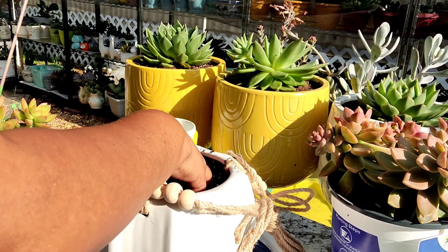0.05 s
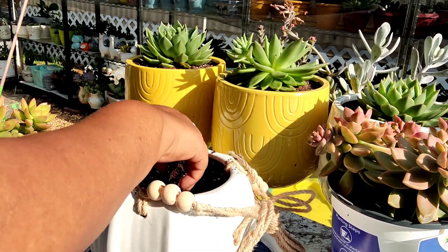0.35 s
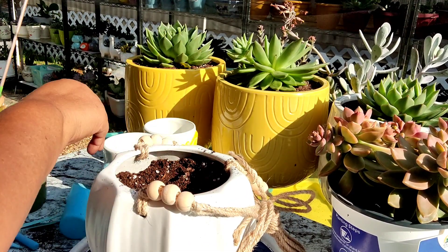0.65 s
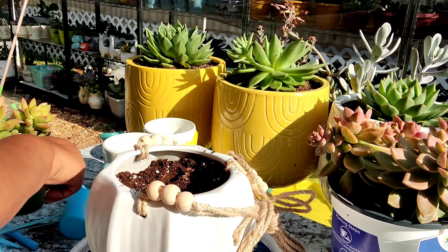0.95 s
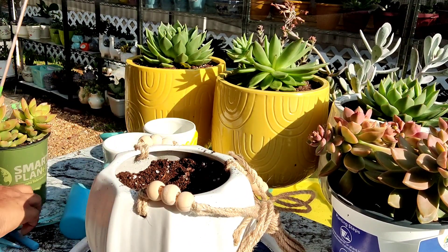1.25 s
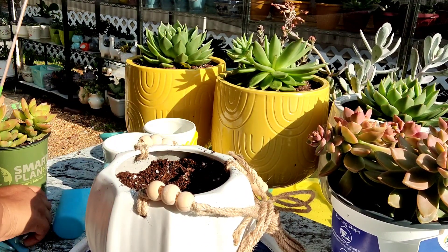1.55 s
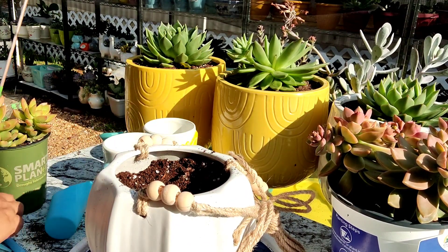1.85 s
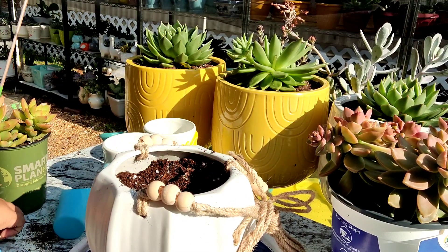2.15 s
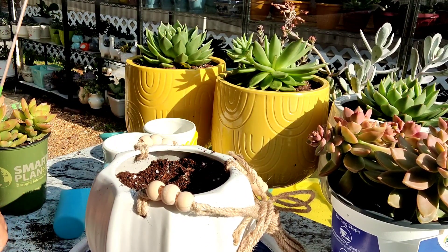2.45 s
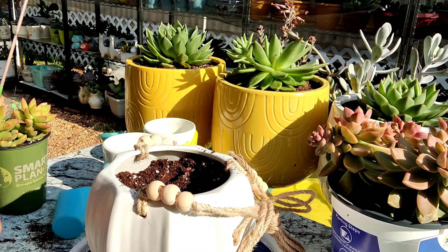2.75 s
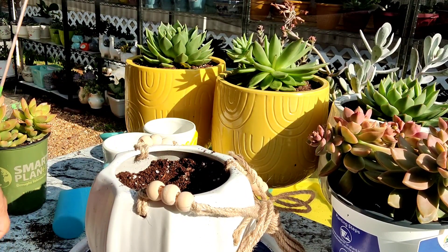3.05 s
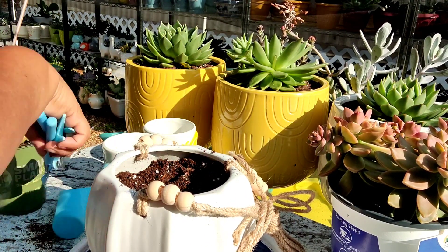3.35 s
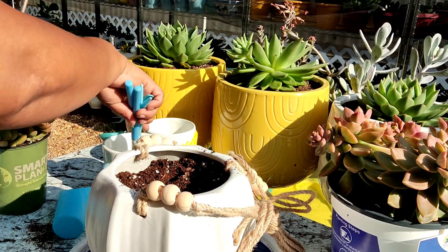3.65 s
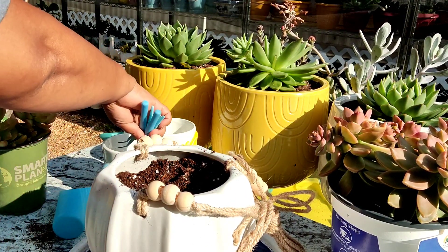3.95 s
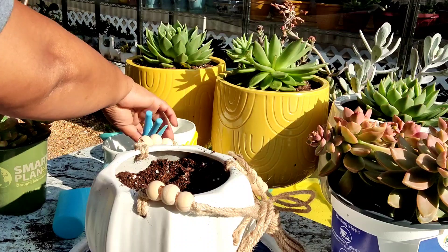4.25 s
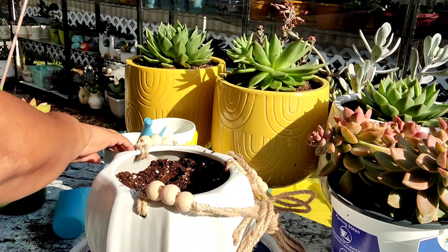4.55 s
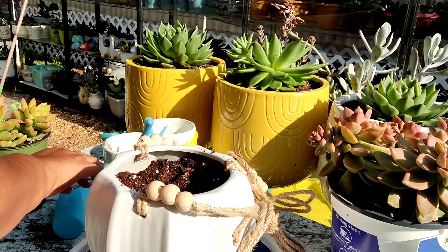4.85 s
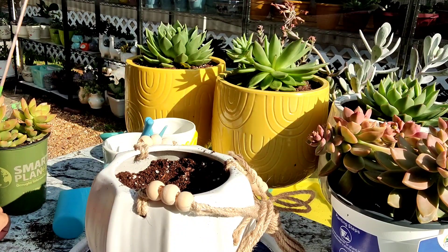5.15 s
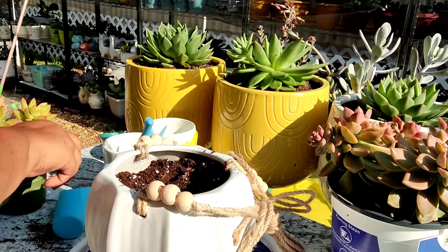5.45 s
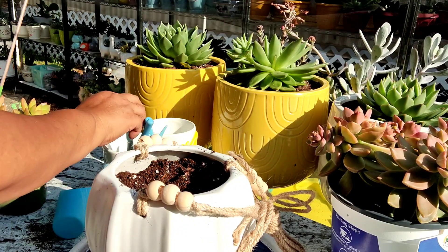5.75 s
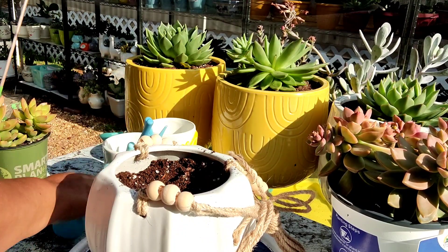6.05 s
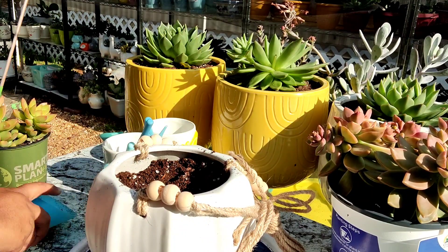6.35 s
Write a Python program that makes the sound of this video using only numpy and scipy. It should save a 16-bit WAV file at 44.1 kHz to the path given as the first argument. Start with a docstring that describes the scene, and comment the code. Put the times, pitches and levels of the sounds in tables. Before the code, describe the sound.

Close to the microphone, small plastic tools are pushed around a gritty potting table, giving soft rubs, light ticks and hollow taps. A cluster of louder, bright clinks follows as they fall into a small ceramic pot, their blades scraping inside and the pot knocking on the table. A last, slightly duller rattle hits the rim near the end. A faint open-air rumble lies underneath.

```python
"""A faint outdoor rumble, and a hand rummaging among small garden tools on a potting table.
The tools rub over spilled soil, bump hollowly and tick against each other; one gives a thin squeak.
Around four seconds some drop into a little ceramic pot: each blow cracks, rings the wall and knocks
the pot on the table, and blades scrape down the glaze. Near six seconds one more rattles on the rim."""
import sys
import numpy as np
from scipy import signal
from scipy.fft import rfft, irfft
from scipy.io import wavfile

SR = 44100
rng = np.random.default_rng(int(sys.argv[2]) if len(sys.argv) > 2 else 0)


def generate_wav(sig):
    """Save sig (samples, or channels by samples) to the path in sys.argv[1] as 16-bit PCM at SR."""
    pcm = np.round(np.clip(np.atleast_2d(sig).T, -1, 1) * 32767).astype(np.int16)
    wavfile.write(sys.argv[1], SR, pcm)


N = 287091
TIME = np.arange(N) / SR
AGE = TIME[:SR // 4]  # seconds since a contact


def from_db(db):
    """Decibels to gain."""
    return np.exp(np.asarray(db) * np.log(10) / 20)


def unit_rms(x):
    """Scale to unit power."""
    return x / np.sqrt(np.mean(x ** 2) + 1e-20)


def add(out, start_s, sound):
    """Mix a sound in at its start time."""
    i = round(start_s * SR)
    out[i:i + len(sound)] += sound[:N - i]


def decay(t60_s):
    """Exponential fade from the moment of contact."""
    return from_db(-60 * AGE / t60_s)


def attack(rise_s):
    """Quick build-up as a contact takes hold."""
    return 1 - np.exp(-AGE / rise_s)


def stroke(start_s, end_s, swell):
    """A movement gathers speed and slows again: a sine arch to the power of swell."""
    progress = np.clip((TIME - start_s) / (end_s - start_s), 0, 1)
    return np.maximum(np.sin(np.pi * progress), 0) ** swell


def colour(x, spectrum):
    """EQ a noise to a curve, rolling off beyond both ends; unit power."""
    hz, db = np.transpose(spectrum)
    f = np.maximum(np.fft.rfftfreq(len(x), 1 / SR), 1)
    curve = from_db(np.interp(np.log(f), np.log(hz), db))
    roll_off = np.minimum(f / hz[0], 1) ** 2 * np.minimum(hz[-1] / f, 1) ** 2
    return unit_rms(irfft(rfft(x) * curve * roll_off, len(x)))


def patchy(x, spread_db=3.0, spacing_hz=331):
    """Every contact has chance resonances of its own: random peaks and dips in the spectrum."""
    f = np.fft.rfftfreq(len(x), 1 / SR)
    peaks_db = spread_db * rng.standard_normal(200)
    curve = from_db(np.interp(f / spacing_hz, np.arange(len(peaks_db)), peaks_db))
    return irfft(rfft(x) * curve, len(x))


def treble_octaves(hz):
    """Octaves above 7 kHz, zero below."""
    return np.maximum(np.log2(hz / 7000), 0)


def harden(table, db_per_octave):
    """Tilt a table's treble: up for a hard contact, down for a soft one."""
    table = np.array(table, float)
    table[:, 1] += db_per_octave * treble_octaves(table[:, 0])
    return table


def partials(modes):
    """One decaying sine per mode."""
    hz, db, t60_s = np.transpose(modes)[:, :, None]
    return from_db(db) * decay(t60_s) * np.sin(2 * np.pi * hz * AGE) * attack(.0015)


def ring(modes, spread_db):
    """Struck modes; each blow excites them a little differently."""
    strengths = from_db(spread_db * rng.standard_normal(len(modes)))
    return strengths * rng.choice([-1, 1], len(modes)) @ partials(modes)


def burst(spectrum, t60_s, tail_db, tail_t60_s):
    """Crowded, quickly damped modes, then a fainter ring from the pots and table around."""
    envelope = np.hypot(decay(t60_s), from_db(tail_db) * decay(tail_t60_s)) * attack(.0009)
    return colour(patchy(rng.standard_normal(len(AGE))), spectrum) * envelope


def grains(per_s, spread_db):
    """Friction: tiny slips of uneven size at random moments."""
    sizes = from_db(spread_db * np.minimum(rng.exponential(1, N), 4)) * rng.choice([-1, 1], N)
    return unit_rms(sizes * (rng.random(N) < per_s / SR))


# Tone of the open air: freq_hz, level_db
AIR_EQ = [(15, -42.5), (25, -26.5), (52, -5.5), (72, -0.5), (92, -10.5), (137, -2), (263, -10),
          (363, -10.5), (463, -12), (503, -12), (545, -14), (1070, -16), (2050, -26), (6740, -35),
          (16000, -52)]
# Swells of the low rumble, rising as the table is handled: time_s, level_db
RUMBLE_SWELLS = [(0.0, -64.5), (1.12, -68.5), (2.44, -61), (3.76, -66.5), (4.24, -61), (5.5, -70.5),
                 (6.26, -62), (6.5, -64)]

def outdoors(rumble_db, hiss_db):
    """A low rumble that swells with the handling on the table, and a steady airy hiss."""
    time_s, swell_db = np.transpose(RUMBLE_SWELLS)
    air = colour(rng.standard_normal(N), AIR_EQ)
    low = signal.sosfiltfilt(signal.butter(2, 400, fs=SR, output="sos"), air)
    swell = from_db(np.interp(TIME, time_s, swell_db) + rumble_db)
    return swell * unit_rms(low) + from_db(hiss_db) * unit_rms(air - low)


# Low end of the table top: freq_hz, level_db
BOOM_EQ = [(70, -8), (140, 1), (240, -5.5), (400, -6)]

def table_boom(level_db=-17.5, t60_s=.35):
    """The table top shudders under every bump and dies away slowly."""
    shudder = colour(rng.standard_normal(N // 8), BOOM_EQ)[:len(AGE)]
    return from_db(level_db) * shudder * decay(t60_s) * attack(.004)


# Envelope of the squeak: time_s, level_db
SQUEAK_ENVELOPE = [(1.44, -90), (1.46, -75), (1.51, -72), (1.565, -57.5), (1.59, -68), (1.61, -81)]
# Its narrow resonances: pitch_hz, width_hz
SQUEAK_BANDS = [(13020, 220), (14150, 300)]

def squeak():
    """Dragged plastic slips and excites thin, high resonances."""
    whistle = np.zeros(N)
    for hz, width in SQUEAK_BANDS:
        band = signal.butter(2, [hz - width / 2, hz + width / 2], "band", fs=SR, output="sos")
        whistle += signal.sosfilt(band, grains(per_s=350, spread_db=2.5))
    time_s, level_db = np.transpose(SQUEAK_ENVELOPE)
    return from_db(np.interp(TIME, time_s, level_db, left=-200, right=-200)) * unit_rms(whistle)


# Resonances of the heap of plastic tools: pitch_hz, level_db, t60_s
HEAP_MODES = [(2476, -9, 0.016), (3028, -4, 0.061), (4090, -3, 0.12), (4500, 1.5, 0.032), (5890, 2, 0.024),
              (6586, 2.5, 0.062), (7050, 2.5, 0.046), (8420, -14.5, 0.032), (10600, -3, 0.039),
              (12400, -26, 0.019), (15800, -25, 0.035)]

def heap_ring():
    """Every contact meets another part of the heap, with slightly different pitches."""
    modes = np.array(HEAP_MODES)
    modes[:, 0] *= 1 + .04 * rng.standard_normal(len(modes))
    return ring(modes, spread_db=4)


# Dull and bright sides of a plastic contact, tapped or dragged: freq_hz, level_db
THUD_EQ = [(80, -4), (200, -2), (480, -7), (640, 1.5), (930, -4.5), (1220, 2.5), (1480, -4.5), (1820, -1),
           (2080, -18), (2500, -6.5), (6000, -43.5)]
TICK_EQ = [(900, -44), (2300, 3), (3500, 1), (4500, -1), (5100, 1.5), (5800, 3), (7200, 0), (9500, -9),
           (12000, -8.5), (15500, -11)]
# Hollow body of the plastic things: pitch_hz, level_db, t60_s
PLASTIC_MODES = [(584, -16, 0.3), (662, -0.5, 0.062), (1231, 0.5, 0.094), (1639, 7, 0.04),
                 (1904, 1.5, 0.054)]
# Nudges on the table: start_s, bump_db, tick_db
NUDGES = [(.381, -60, -89), (.444, -59, -73), (1.368, -56, -80), (1.398, -40.5, -61), (1.408, -46.5, -60),
          (1.424, -36.5, -63), (1.474, -41, -46.5), (1.544, -44, -57.5), (1.66, -67, -60),
          (1.725, -62, -60.5), (2.115, -51.5, -82), (2.155, -50, -44), (2.163, -50.5, -41.5),
          (2.21, -40.5, -35.5), (2.305, -46, -45), (2.331, -40, -44.5), (2.349, -47.5, -44),
          (2.376, -48, -60), (2.475, -52, -51.5), (2.509, -50.5, -47), (2.586, -56.5, -50.5),
          (2.706, -51.5, -51), (2.776, -60.5, -58.5), (2.824, -60, -47), (2.86, -41.5, -57.5),
          (2.922, -51, -54), (2.99, -51, -52), (3.040, -53, -55.5), (5.258, -61, -75), (6.226, -61.5, -55)]

def plastic_taps(ring_db, snap_db, hollow_db, thud_db):
    """Plastic things bump the table hollowly and tick against each other."""
    out = np.zeros(N)
    for start_s, bump_db, tick_db in NUDGES:
        snap = from_db(snap_db) * burst(TICK_EQ, t60_s=.015, tail_db=-18.5, tail_t60_s=.11)
        tick = snap + from_db(ring_db) * heap_ring()
        thud = from_db(thud_db) * burst(THUD_EQ, t60_s=.042, tail_db=-12.5, tail_t60_s=.22)
        bump = thud + from_db(hollow_db) * ring(PLASTIC_MODES, spread_db=5) + table_boom()
        add(out, start_s, from_db(bump_db) * bump + from_db(tick_db) * tick)
    return out


# Strokes of the hand through soil and tools: start_s, end_s, rub_db, grit_db
HAND_STROKES = [(-.3, 0.697, -70, -87.5), (1.383, 1.547, -55.5, -70), (1.5, 1.617, -55.5, -64),
                (1.553, 1.813, -65.5, -74), (2.094, 2.312, -56, -60.5), (2.293, 2.422, -54, -64.5),
                (2.423, 2.584, -55.5, -65.5), (2.61, 2.944, -60, -70), (2.924, 3.099, -53.5, -66.5),
                (3.089, 3.169, -63, -66), (3.103, 3.31, -71, -81.5), (6.171, 6.32, -64.5, -74.5),
                (6.297, 6.6, -83, -82)]

def rummage(rub_db, grit_db, touch_db, touch_count, catch_db=1.5, catch_hz=43):
    """Tools catch and slip as they are dragged over spilled soil, and touch each other lightly."""
    strokes = sum(from_db(levels_db)[:, None] * stroke(start_s, end_s, swell=.69)
                  for start_s, end_s, *levels_db in HAND_STROKES)
    catching = colour(rng.standard_normal(N), [(catch_hz / 2, 0), (catch_hz, 0)])
    rub_envelope, grit_envelope = strokes * unit_rms(from_db(catch_db * catching))
    rub = from_db(rub_db) * colour(grains(per_s=500, spread_db=.5), THUD_EQ)
    crumbs = grains(per_s=1500, spread_db=3)
    rings = [heap_ring() for _ in range(24)]
    touches = np.zeros(N)
    for k, start_s in enumerate(rng.uniform(0, TIME[-1], touch_count)):
        add(touches, start_s, rng.rayleigh() * rings[k % len(rings)])
    grit = from_db(grit_db) * colour(patchy(crumbs), TICK_EQ)
    return rub_envelope * rub + grit_envelope * (grit + from_db(touch_db) * unit_rms(touches))


# Voices of four tools, one list each (the third also holds the pot's hollow base notes near 770 and 1070 Hz):
# pitch_hz, level_db, t60_s
TOOL_MODES = [
    [(4570, 0.5, 0.03), (7900, 3.5, 0.026), (8480, 15.5, 0.011), (9050, 9, 0.013), (14320, -11, .04)],
    [(4010, 2.5, 0.1), (4600, 3, 0.024), (5550, -17, .058), (6900, -20, .05), (12000, -2, 0.019)],
    [(773, -1.5, 0.02), (1065, -29.5, 0.21), (4220, -7.5, 0.029), (4650, -9.5, 0.088), (6290, -3, 0.028),
     (8020, -4.5, 0.029), (8260, -13, 0.082), (11983, -34, 0.21)],
    [(5330, 4, .085), (7230, -8.5, 0.074), (7830, -4, .09), (11000, -16, .11)],
]
# Hits on those tools, one list each: start_s, level_db
TOOL_STRIKES = [
    [(2.163, -39.5)],
    [(2.209, -34)],
    [(3.950, -24.5), (4.332, -39)],
    [(2.305, -50), (4.151, -40), (4.398, -28.5)],
]

def tool_rings():
    """Each small tool rings briefly at its pitches when knocked; the third also sounds the pot's hollow base
    notes."""
    out = np.zeros(N)
    for modes, strikes in zip(TOOL_MODES, TOOL_STRIKES):
        for start_s, level_db in strikes:
            add(out, start_s, from_db(level_db) * ring(modes, spread_db=2.5))
    return out


# Body of the pot's knock on the table: freq_hz, level_db
KNOCK_EQ = [(50, -8.5), (130, -1), (330, -1), (500, -10), (780, 3.5), (980, -5), (1200, -1.5),
            (1900, -15.5), (2400, -6.5), (4000, -23.5)]
# Hollow notes of the standing pot: pitch_hz, level_db, t60_s
BASE_MODES = [(369, -4, 0.16), (766, 1, 0.1), (1153, 0.5, 0.14), (1380, -13, .05)]

def pot_knock():
    """The pot's base knocks hollowly on the table, which booms below it."""
    knock = 1.05 * burst(KNOCK_EQ, t60_s=.037, tail_db=-9.5, tail_t60_s=.12)
    return knock + .38 * ring(BASE_MODES, spread_db=3) + table_boom()


# Modes of the ceramic wall, many in close pairs: pitch_hz, level_db
WALL_MODES = [(778, -26.5), (1195, -22), (2290, -30.5), (3009, -12.5), (3048, -13), (4142, -23),
              (4503, -18), (4635, -2), (4716, -18), (5229, -10), (5315, -17), (5522, -6), (5592, -15.5),
              (6476, -24), (7337, -25.5), (7825, -28), (8380, -22.5), (8607, -20.5), (8692, -16.5),
              (8876, -23), (9245, -14.5), (9519, -24), (10218, -13), (11057, -23), (12452, -23.5)]

def pot_modes(shimmer_db, shimmer_count, t60_at_3khz_s=.14, damping_power=.35):
    """The wall's strong modes plus a shimmer of faint high ones; higher modes die sooner."""
    shimmer = [(hz, shimmer_db) for hz in rng.uniform(5800, 15500, shimmer_count)]
    hz, db = np.transpose(WALL_MODES + shimmer)
    return np.transpose([hz, db, t60_at_3khz_s * (3000 / hz) ** damping_power])


# Bright edge of a tool on glaze, scraped or struck: freq_hz, level_db
GLAZE_EQ = [(1000, -23), (2400, -15.5), (3500, -8), (4300, 6), (5600, -0.5), (6600, 2.5), (7300, 3.5),
            (7900, -6), (8600, -2), (11500, -8.5), (15500, -8.5)]
# Slides down the pot's wall: start_s, end_s, scrape_db, rumble_db
BLADE_SLIDES = [(4.148, 4.184, -48.5, -46), (4.292, 4.35, -70.5, -61.5), (4.333, 4.409, -45.5, -61),
                (4.401, 4.485, -39.5, -50), (4.492, 4.536, -40.5, -46.5)]

def blade_slides(pot, ring_db):
    """Blades chatter down the glaze and keep the wall's high modes singing."""
    scrape, rumble = np.zeros((2, N))
    for start_s, end_s, scrape_db, rumble_db in BLADE_SLIDES:
        speed = stroke(start_s, end_s, swell=.41)
        scrape += from_db(scrape_db) * speed
        rumble += from_db(rumble_db) * speed
    slips = grains(per_s=3000, spread_db=5)
    high_modes = pot[pot[:, 0] > 3500]
    wall = ring(harden(high_modes, db_per_octave=7.5), spread_db=4.5)
    singing = signal.fftconvolve(slips * scrape, wall / np.linalg.norm(wall))[:N]
    chatter = scrape * colour(patchy(slips), GLAZE_EQ) + rumble * colour(slips, KNOCK_EQ)
    return chatter + from_db(ring_db) * singing


# Hollow bump of a tool's handle: freq_hz, level_db
HANDLE_EQ = [(300, -14), (700, -6), (1080, -11), (1220, 4), (1700, -1), (2050, -15.5), (3700, -13),
             (4400, -0.5), (4900, -10), (7000, -23.5)]
# Blows on the pot: start_s, ring_db, bluntness (0 = blade tip, 1 = handle on the rim), knock_db
POT_BLOWS = [(3.949, -40.5, 0.22, -42.5), (4.003, -30.5, 0.91, -53), (4.152, -39.5, 0.86, -42.5),
             (4.169, -44, 0.49, -41.5), (4.21, -58, 0, -59.5), (4.291, -60, 0.7, -55),
             (4.320, -50, 1, -55.5), (4.33, -38.5, 0.35, -44), (4.340, -32.5, .4, -33.5),
             (4.398, -31.5, 0.2, -45), (4.404, -33.5, 0, -46), (4.416, -32.5, 0, -52),
             (4.424, -14.5, .25, -49.5), (4.470, -37, 0, -45), (4.495, -32.5, 0.92, -68.5),
             (4.509, -31, 0.38, -44), (4.515, -52, .1, -44.5), (4.53, -40, 0, -42),
             (5.95, -41.5, 0.19, -47), (5.967, -21.5, 0.96, -38.5), (6.022, -22, 0.88, -44.5),
             (6.050, -25, 0.98, -48), (6.067, -33, 1, -46)]

def pot_clinks(pot):
    """Each blow cracks, rings and knocks the pot; a blunt one is duller and flexes the wall more."""
    out, waves, hz = np.zeros(N), partials(pot), pot[:, 0]
    flexing = (hz > 2700) & (hz < 3500)  # the wall's flexing pair of modes
    treble = treble_octaves(hz)
    # the wall loses much of its swing at once to the touching tool, then rings freely
    settle = .7 + .8 * np.exp(-AGE / .005)
    for start_s, ring_db, bluntness, knock_db in POT_BLOWS:
        flex_db = np.interp(bluntness, [0, 1], [-13.5, 4])
        tilt_db_per_octave = np.interp(bluntness, [0, 1], [3, -16])
        crack_db = np.interp(bluntness, [0, 1], [-2, -13.5])
        handle_db = np.interp(bluntness, [0, 1], [-34.5, -6])
        # the short waves of high modes are the most sensitive to where the blow lands
        chance_db = (.6 + 4 * treble) * rng.standard_normal(len(hz))
        strengths = from_db(flexing * flex_db + treble * tilt_db_per_octave + chance_db)
        wall = strengths * rng.choice([-1, 1], len(hz)) @ waves
        crack = burst(harden(GLAZE_EQ, tilt_db_per_octave), t60_s=.04, tail_db=-14, tail_t60_s=.13)
        handle = burst(HANDLE_EQ, t60_s=.02, tail_db=-16.5, tail_t60_s=.13)
        clink = settle * wall + from_db(crack_db) * crack + from_db(handle_db) * handle
        add(out, start_s, from_db(ring_db) * clink + from_db(knock_db) * pot_knock())
    return out


def scene():
    """The pot and tools up close over the outdoor bed, in mono."""
    pot = pot_modes(shimmer_db=-35, shimmer_count=44)
    clatter = pot_clinks(pot) + blade_slides(pot, ring_db=-.5) + tool_rings()
    taps = plastic_taps(ring_db=-10.5, snap_db=6, hollow_db=-10.5, thud_db=-.5)
    dragging = rummage(rub_db=-4, grit_db=-2, touch_db=-4.5, touch_count=450) + squeak()
    return (clatter + taps + dragging + outdoors(rumble_db=1, hiss_db=-72.5))[None]


def record(dry):
    """A steep low-pass takes off the very top."""
    cutoff_hz = 15550
    return signal.sosfilt(signal.ellip(10, .2, 70, cutoff_hz, fs=SR, output="sos"), dry)


dry = scene()
out = record(dry)
generate_wav(out)
```